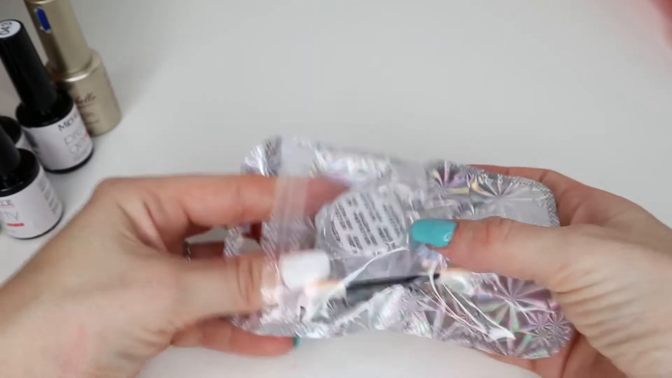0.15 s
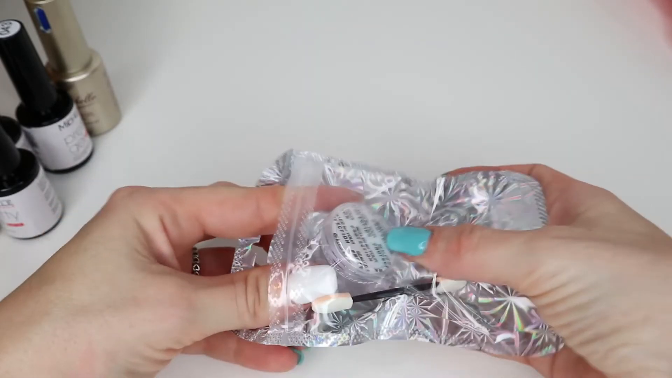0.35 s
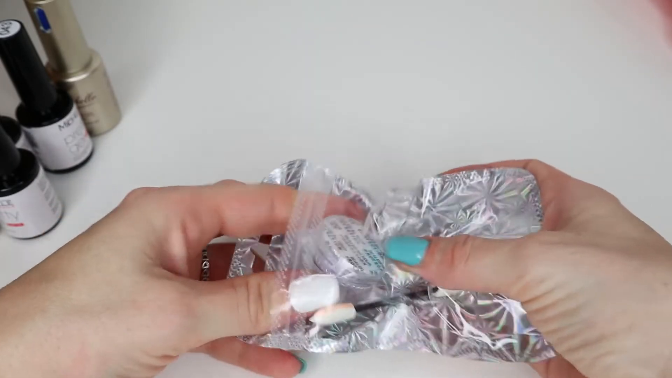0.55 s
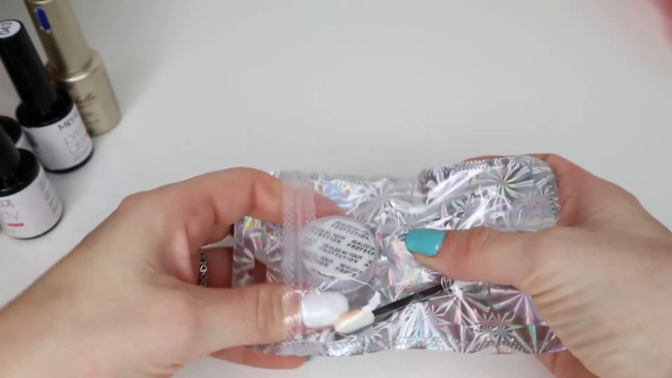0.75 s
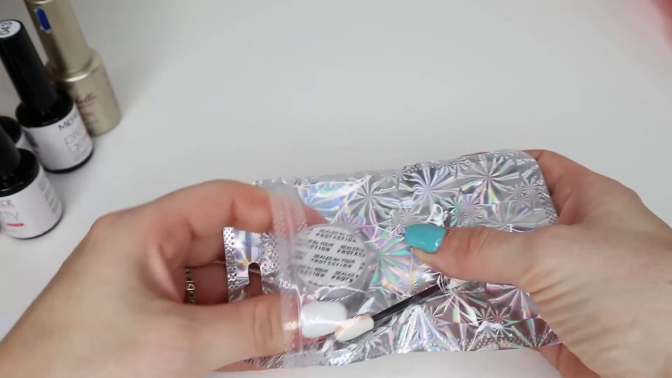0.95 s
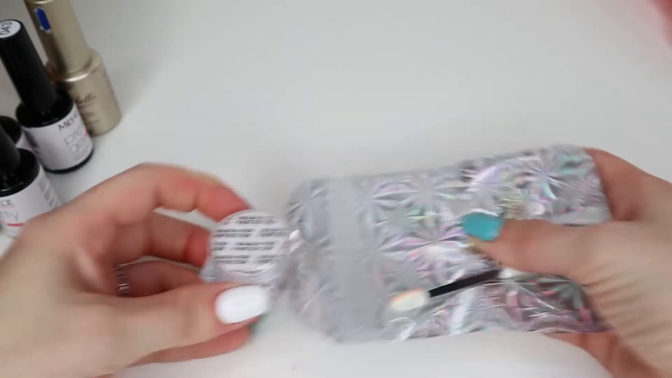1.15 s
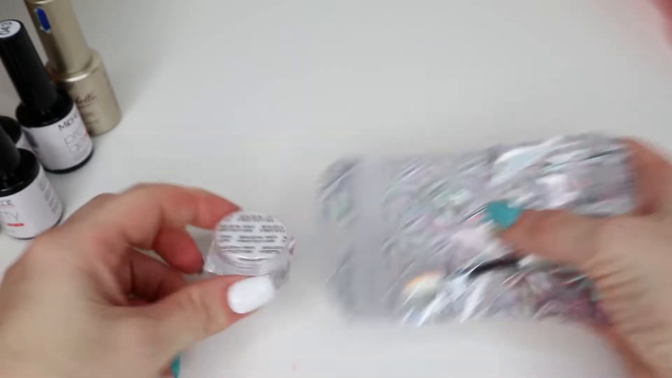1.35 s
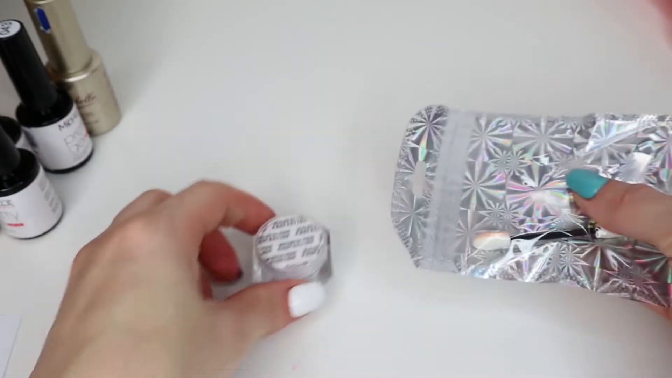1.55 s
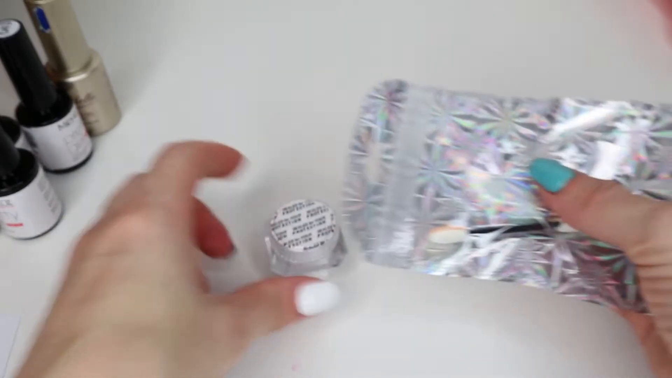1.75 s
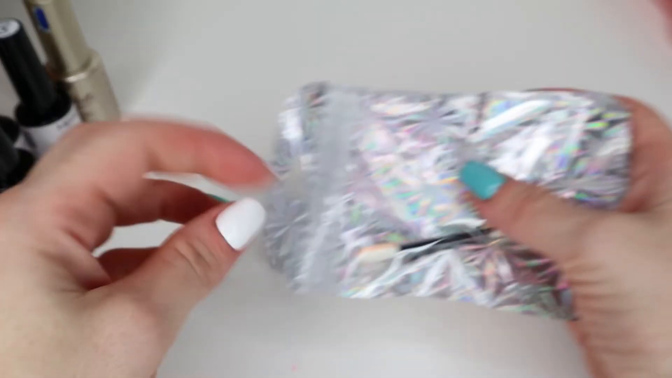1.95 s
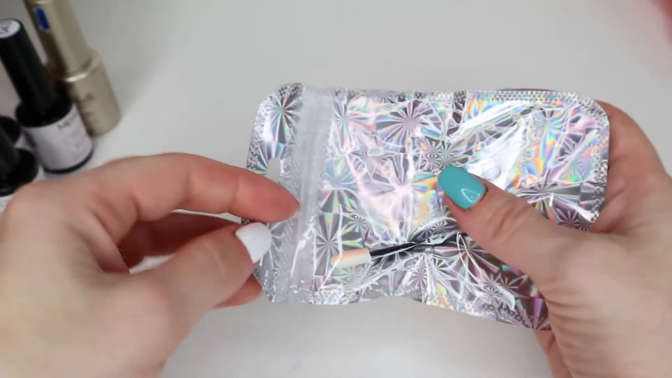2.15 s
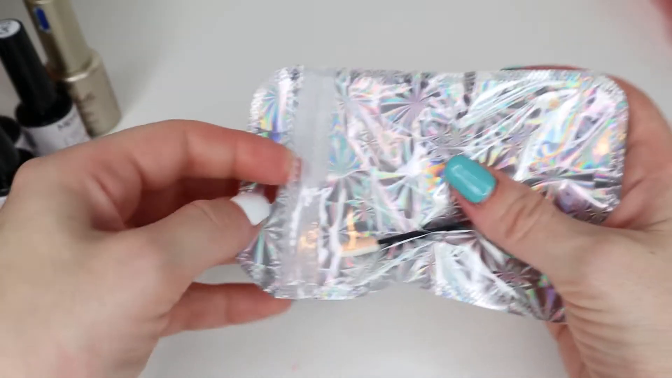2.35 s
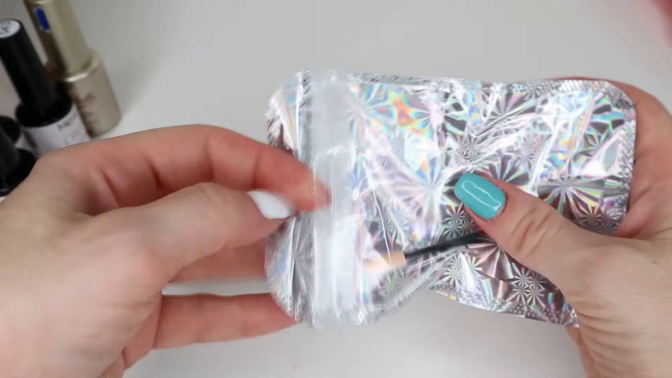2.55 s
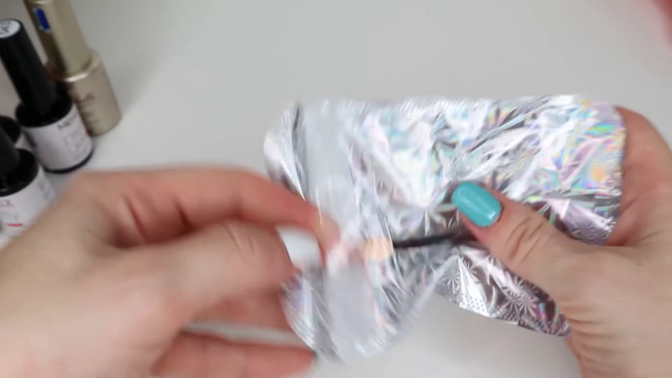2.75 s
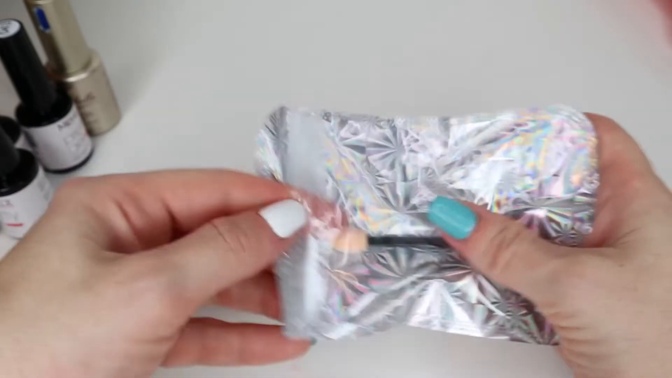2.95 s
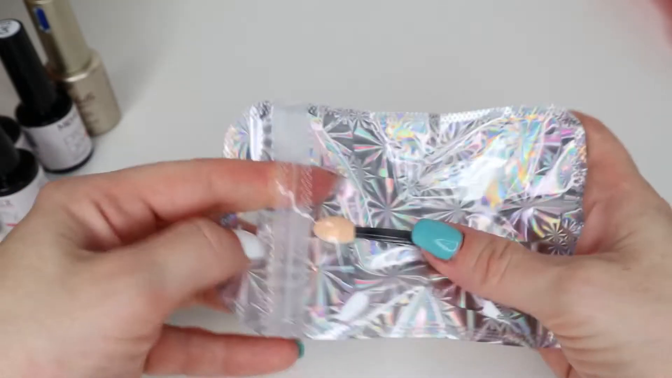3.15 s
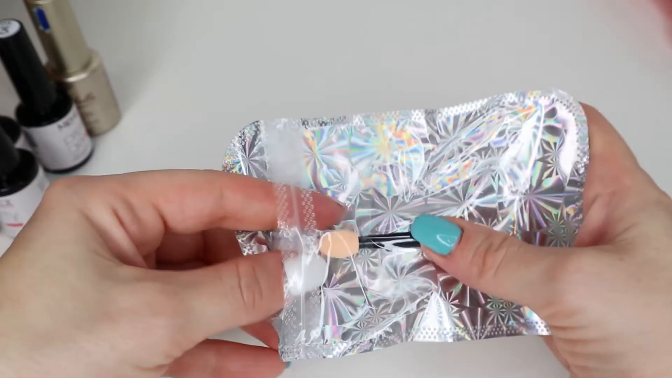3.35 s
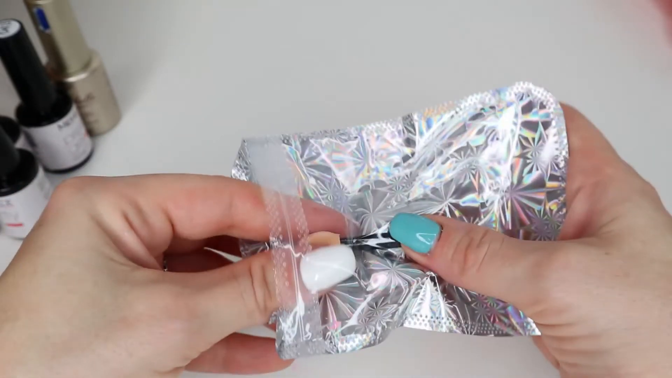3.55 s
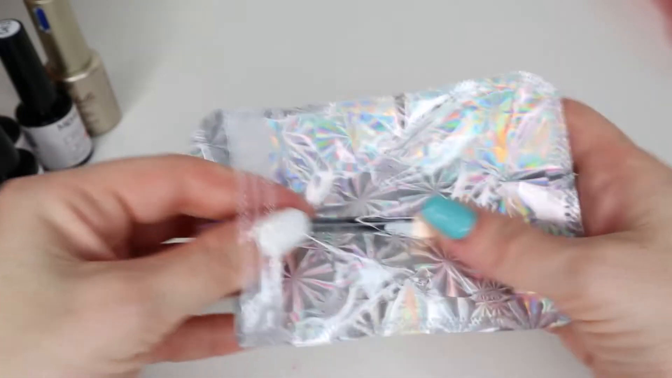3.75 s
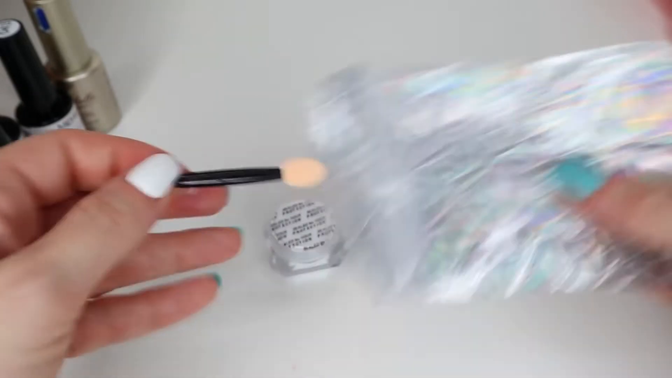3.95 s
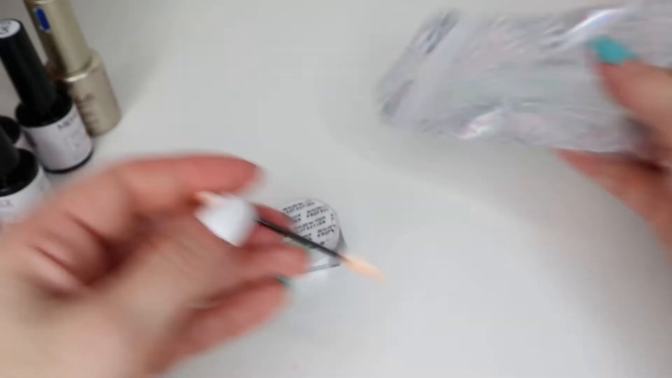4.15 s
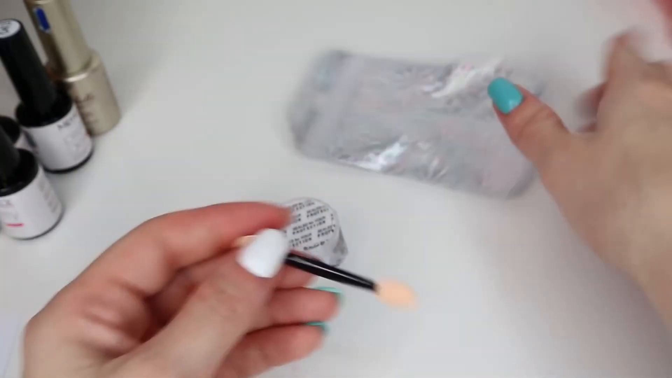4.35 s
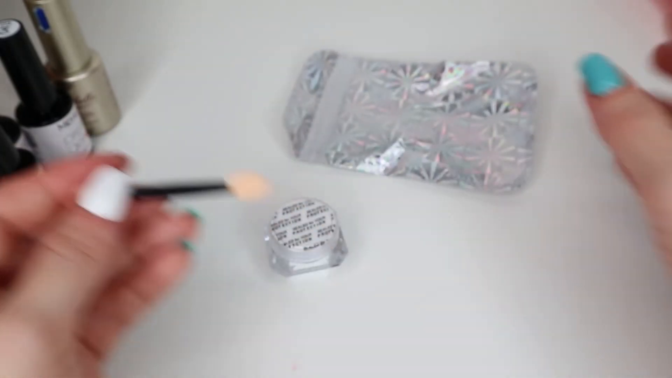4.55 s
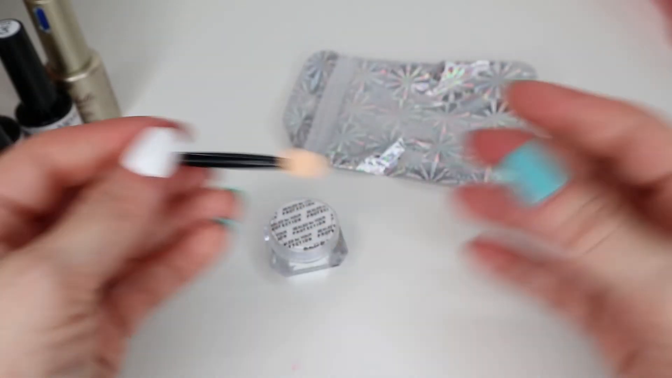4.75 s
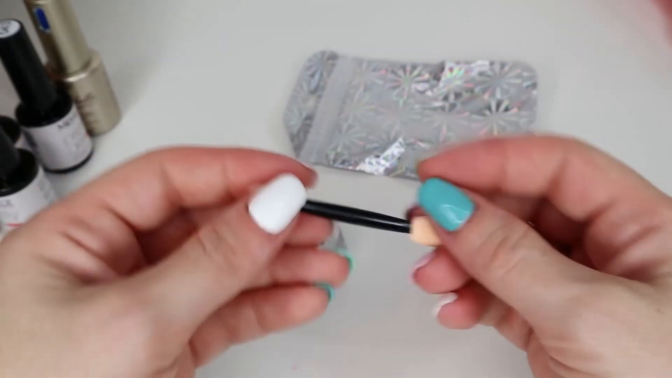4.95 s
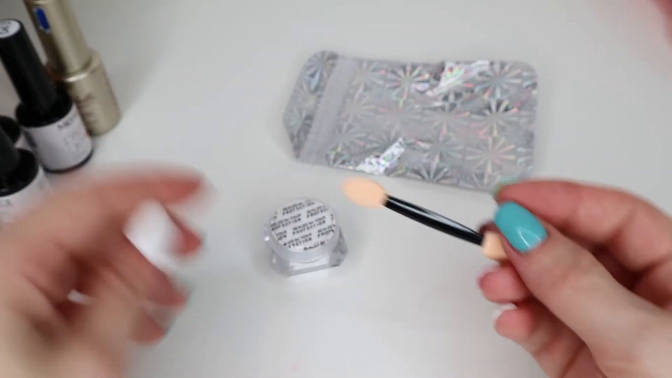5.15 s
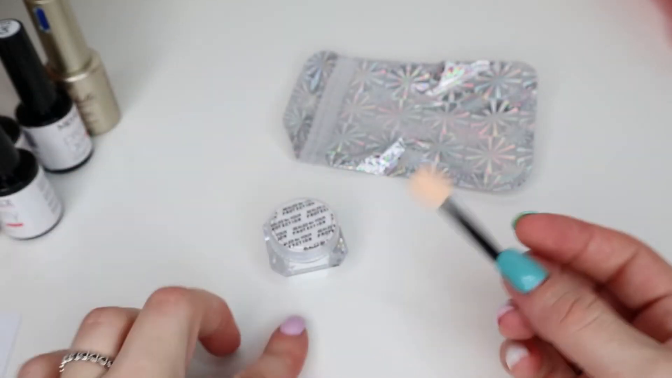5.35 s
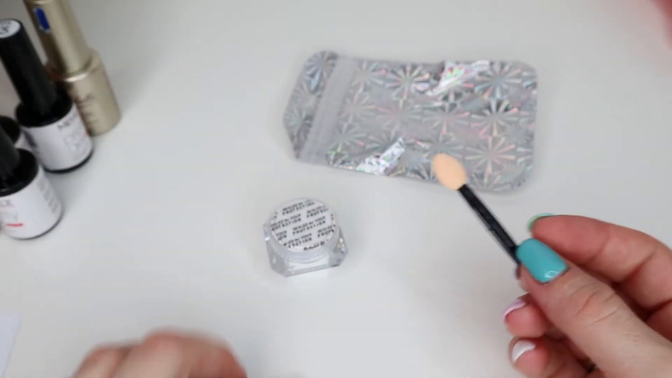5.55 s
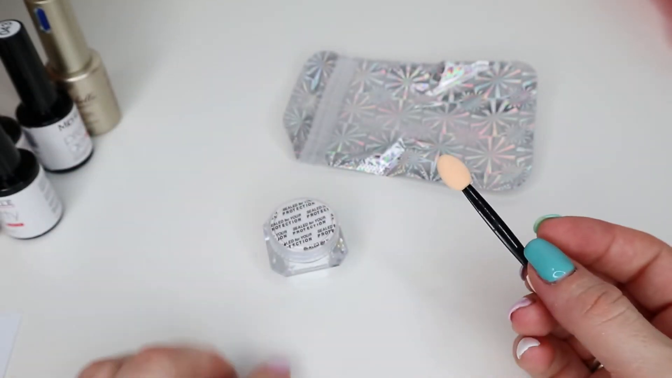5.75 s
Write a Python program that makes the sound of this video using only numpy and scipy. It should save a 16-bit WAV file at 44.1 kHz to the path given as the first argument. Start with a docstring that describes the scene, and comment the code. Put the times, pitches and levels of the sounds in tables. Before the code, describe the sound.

A close stereo pickup in a small, lively room with a quiet bed of low rumble and hiss. From the start, hands squeeze a foil zip pouch: fine dry crackle with crisp, irregular snaps, densest between 0.1 and 0.8 s, then thinning. At about 1.1 s a quick scraping rustle lets a small jar slide out. It lands at 1.5 s with a hard, bright clack, rocks in rapid knocks, then tips and rattles to rest from 1.74 to 1.85 s. A lull follows with a very faint thin whistle near 2 s. A lone sharp snap comes at 2.2 s; crinkling grows from 2.5 s, is busiest around 3 to 3.5 s, and bursts again at 3.75 to 3.95 s. A few last crackles pass by 4.1 s, with another faint sinking whistle and slight low hum. After near quiet, soft tabletop taps and dull thumps come at 5.4 s and 5.55 to 5.75 s.

```python
"""Fine foil crackle comes in spells, and larger creases snap through one by one as hands flex a zip pouch.
Each crease is a jerky noise burst with facet rings, shaped band by band; a run of tiny slips lets a jar out.
The jar clatters and settles as decaying modes with a clack; soft thumps are low modes and taps of noise.
A thin whistle and a low hum are wavering tones; a small live room adds echoes over a bed of shaped noise."""
import sys
import numpy as np
from scipy import signal
from scipy.fft import rfft, irfft
from scipy.io import wavfile

SR = 44100
rng = np.random.default_rng(int(sys.argv[2]) if len(sys.argv) > 2 else 0)


def wav_record(signal):
    """Record a signal, one row per channel, as 16-bit PCM in the file named by sys.argv[1]."""
    frames = np.transpose(np.atleast_2d(signal))
    bounded = np.clip(frames, -1, 1)
    # unit amplitude maps onto the largest positive 16-bit level
    quanta = np.round(bounded * 32767).astype(np.int16)
    wavfile.write(sys.argv[1], SR, quanta)


N = 256426
TAPS = 2048  # samples in a short burst or filter
HZ = np.fft.rfftfreq(TAPS, 1 / SR)


def amp(db):
    """Level law: decibels become an amplitude gain."""
    return 10 ** (np.asarray(db) / 20)


def unit(x):
    """Energy normalization: each signal is scaled to a sum of squares of 1."""
    return x / np.sqrt(np.sum(x ** 2, -1, keepdims=True) + 1e-20)


def read(points, hz):
    """Interpolation of a (frequency, value) table along a logarithmic frequency axis."""
    f, value = np.transpose(points)
    return np.interp(np.log(hz + 1), np.log(f + 1), value)


def add(mix, s, sound):
    """Superposition: a sound is added to the mix from time s in seconds."""
    part = mix[..., max(round(s * SR), 0):][..., :sound.shape[-1]]
    part += sound[..., :part.shape[-1]]


def causal(db):
    """Minimum phase: folding the cepstrum gives the most abrupt pulse of a given colour."""
    cepstrum = irfft(np.log(amp(db)))
    cepstrum[..., 1:TAPS // 2] *= 2
    cepstrum[..., TAPS // 2 + 1:] = 0
    return np.exp(rfft(cepstrum))


def pair(a, b, likeness):
    """Stereo coherence: unrelated mid and side signals mix to a left and right of the given likeness."""
    c = np.clip(likeness, -1, 1)
    mid = a * np.sqrt((1 + c) / 2)
    side = b * np.sqrt((1 - c) / 2)
    return np.array([mid + side, mid - side])


def ring(modes, t, uneven_db=2):
    """Modal synthesis: exponentially dying sines, each excited a little differently by every blow."""
    hz, db, t60 = np.transpose(modes)[:, :, None]
    height = amp(db + uneven_db * rng.standard_normal(hz.shape) - 60 * t / t60)
    return (height * np.sin(2 * np.pi * hz * t)).sum(0)


def contact(colour, decay_s, apart_hz=8000):
    """Impact noise: a brief coloured burst of energy 1 on each side, less alike in the treble."""
    decay = np.exp(-np.arange(TAPS) / SR / decay_s)
    noise = rfft(rng.standard_normal((2, TAPS)) * decay)
    stereo = pair(*noise, np.exp(-(HZ / apart_hz) ** 2))
    return unit(irfft(stereo * causal(read(colour, HZ))))


def narrow(hz, width_hz, likeness=0.99):
    """Modulation: slow noise carried up to the pitch hz makes a wavering tone of RMS level 1."""
    offset = np.fft.fftfreq(N, 1 / SR)
    spectrum = np.fft.fft(rng.standard_normal((2, N)))
    drift = np.fft.ifft(spectrum / (1 + 1j * offset / width_hz) ** 3)
    phase = 2 * np.pi * np.cumsum(hz * np.ones(N)) / SR
    tone = (drift * np.exp(1j * phase)).real
    return np.sqrt(N) * pair(*unit(tone), likeness)


# Limits of the bands that describe a crease. Each entry: band edge in Hz.
BAND_EDGES_HZ = [150, 600, 1400, 2800, 6000, 15000]
# The pouch as a whole colours every crease. Each row: frequency in Hz, relative level in dB.
POUCH_COLOUR = [(50, -36), (150, -17.5), (300, 0.5), (390, 1.5), (480, -3.5), (660, -3.5), (770, 3.5),
                (900, -2), (1100, 0), (1350, -2), (2250, -3), (2650, 0.5), (2950, -3), (3300, 1),
                (4550, -1), (5500, -1), (8000, -1.5), (11500, -3), (16000, -30.5)]
POWER_WINDOW_S = .005  # the energy of a crease is expressed as mean power over this time


def resonance(centre_hz, gain_db, width_hz):
    """Resonance: a single peak raises the spectrum around its centre."""
    return 1 + (amp(gain_db) - 1) / (1 + 2j * (HZ - centre_hz) / width_hz)


def creases(rows, crack_s=0.000098, jerk_db=-2, flutter_db=-12, shiver_s=0.017, shiver_db=-26,
            ring_db=9, ring_width_hz=190, upper_ring_hz=3300, upper_spread=0.29,  # spread in octaves
            upper_ring_db=6, upper_width_hz=650, apart_hz=9800):
    """Buckling: rows of (s, ring Hz, flutter s, dB in each band) crack in three jerks, flutter and ring."""
    t = np.arange(TAPS) / SR
    ring_hz, length = rows[:, 1:2], rows[:, 2:3]
    shape = np.exp(-t / crack_s)
    shape = shape + amp(flutter_db) * np.exp(-t / length)
    shape = shape + amp(shiver_db) * np.exp(-t / shiver_s)
    for share in rng.random((2, len(rows), 1)):
        age = t - length * share
        shape = shape + amp(jerk_db) * np.exp(-abs(age) / crack_s) * (age > 0)
    noise = rfft(rng.standard_normal((len(rows), 2, TAPS)) * shape[:, None])

    # short waves leave the sheet differently towards the two microphones
    burst = pair(noise[:, 0], noise[:, 1], np.exp(-(HZ / apart_hz) ** 3))
    burst = burst * causal(read(POUCH_COLOUR, HZ))
    burst = burst * resonance(ring_hz, ring_db, ring_width_hz)
    # a higher ring sits wherever the foil happens to be stretched
    upper_hz = upper_ring_hz * 2 ** (upper_spread * rng.standard_normal(ring_hz.shape))
    burst = burst * resonance(upper_hz, upper_ring_db, upper_width_hz)

    # the size and stiffness of the facet share the energy out among the bands
    low, high = np.array(BAND_EDGES_HZ[:-1]), np.array(BAND_EDGES_HZ[1:])
    member = ((HZ[:, None] >= low) & (HZ[:, None] < high)) * 1.
    centres = np.sqrt(low * high)
    blend = np.array([read(list(zip(centres, one)), HZ) for one in np.eye(len(low))])
    for _ in range(2):  # smooth filters overlap the bands, so a second pass comes closer
        power = (abs(burst) ** 2).mean(0) @ member * 2 / (TAPS * POWER_WINDOW_S * SR)
        burst = burst * causal((rows[:, 3:] - 10 * np.log10(power)) @ blend)

    out = np.zeros((2, N))
    for s, sound in zip(rows[:, 0], irfft(burst).swapaxes(0, 1)):
        add(out, s, sound)
    return out


# Large creases snapping through. Each row: start in seconds, level in dB over 5 ms, brightness in dB per
# octave, breadth in dB per octave squared (low = only the middle sounds), facet ring in Hz,
# flutter length in seconds.
SNAPS = [(0.019, -39.5, -1, 3.5, 1220, 0.0012), (0.0924, -22, -1, 0, 1860, 0.0028),
         (0.0955, -10, 2, 1.5, 830, 0.0016), (0.112, -34, 0, 1, 1380, 0.0022),
         (0.133, -24.5, -5.5, -4, 850, 0.0028), (0.1857, -26.5, 1.5, 3, 1810, 0.0022),
         (0.1995, -21.5, 1, 0.5, 1020, 0.0058), (0.2091, -20.5, -1.5, -1, 730, 0.00095),
         (0.2248, -16.5, -1, 0.5, 1390, 0.005), (0.2457, -22, 2.5, 0.5, 1480, 0.0033),
         (0.2853, -23.5, -1.5, 3, 1000, 0.0058), (0.2914, -20.5, -3, 0, 810, 0.0052),
         (0.315, -28, 3.5, -1, 1040, 0.0035), (0.342, -28, -10.5, 6, 1010, 0.0029),
         (0.4179, -15, -1.5, 2.5, 940, 0.0022), (0.4227, -16, 2.5, 0, 1670, 0.001),
         (0.4333, -27, 1.5, -6, 1430, 0.0036), (0.4367, -18, 1.5, 0, 1360, 0.0042),
         (0.44, -16, 10.5, -3, 1100, 0.0011), (0.4619, -17.5, 6, -5.5, 1590, 0.0026),
         (0.464, -24.5, 0.5, 1, 1690, 0.0016), (0.4904, -24.5, 2, 2, 1450, 0.002),
         (0.5294, -24.5, 1.0, 0, 930, 0.0014), (0.5554, -13.5, 0, 1, 1770, 0.0037),
         (0.5946, -21, 0.5, -1, 1750, 0.0021), (0.61, -23.5, 2, 0.5, 1600, 0.0048),
         (0.6194, -18, 0.5, 2, 1100, 0.0015), (0.6356, -24.5, 16, -3, 1730, 0.0025),
         (0.645, -20.5, 2, -3.5, 1710, 0.0051), (0.667, -21, 2, 0, 1910, 0.0021),
         (0.682, -24, 4, -5.5, 1380, 0.0059), (0.733, -19.5, 7, -0.5, 1720, 0.0025),
         (0.74, -20, 1.5, -2, 1070, 0.0013), (0.7588, -19.5, 3.5, 0.5, 1340, 0.0032),
         (0.787, -29, -1.5, -2, 1100, 0.0034), (0.838, -26.5, -2, 2, 835, 0.0024),
         (0.885, -28, -1, -1, 1620, 0.0018), (0.917, -31, -1.5, 2, 1020, 0.0021),
         (0.933, -34, 1.5, -1, 1300, 0.0015), (1.012, -27.5, 2.5, 0, 1060, 0.0041),
         (1.112, -27.5, -2, 1, 1200, 0.0043), (1.1274, -20, 0, -3.5, 1660, 0.0035),
         (1.1331, -16, 0, 0.5, 860, 0.0046), (1.149, -17, 4, 0.5, 840, 0.0046),
         (1.1635, -16, 2, -0.5, 820, 0.0049), (1.1957, -18.5, -2, 1, 1050, 0.006),
         (1.333, -31.5, -3, 1, 1210, 0.004), (1.4564, -29, -0.5, 1, 740, 0.0026),
         (2.0903, -33.5, -8, -2, 985, 0.0015), (2.134, -33, -4, 1.5, 810, 0.0022),
         (2.16, -34, -0.5, -1, 890, 0.00096), (2.2097, -31.5, -3, -2, 980, 0.00098),
         (2.2202, -11.5, 1, 1.27, 1100, 0.0017), (2.3117, -32.5, -4, 4, 1080, 0.0055),
         (2.365, -35.5, -8, -2, 1110, 0.0026), (2.485, -28, -2, 1.5, 1730, 0.0044),
         (2.4913, -24, 4.5, -2.5, 1700, 0.0038), (2.606, -20.5, 2, 1.0, 840, 0.0026),
         (2.623, -20.5, 0, 2, 785, 0.00099), (2.711, -25, -11.5, 1.5, 850, 0.0011),
         (2.7211, -25, 5.5, -3, 980, 0.0017), (2.769, -22, -2, 0.5, 900, 0.0037),
         (2.783, -48.5, -14, -11.5, 1810, 0.0018), (2.809, -16, 4, -1.5, 820, 0.0028),
         (2.831, -23, 0, 1, 775, 0.003), (2.8495, -22, -3, -1, 760, 0.0039),
         (2.863, -23, 3.5, -2, 1330, 0.0015), (2.872, -22, 1, 2.5, 1190, 0.001),
         (2.8966, -26, -1.5, 0, 1140, 0.0011), (2.9733, -19.5, -2, -0.5, 1160, 0.0033),
         (2.9934, -15, 1, 1, 840, 0.0028), (3.007, -27.5, -3.5, -1.5, 939, 0.0024),
         (3.0354, -19.5, 2.5, -3.5, 1700, 0.0035), (3.059, -16, -2, 0.5, 855, 0.0032),
         (3.0757, -19, 2, -1, 1030, 0.00049), (3.083, -32, -2, 1.5, 820, 0.0012),
         (3.1025, -19.5, 3, 1.0, 1130, 0.0019), (3.121, -22.5, 1.5, 1.5, 1120, 0.0034),
         (3.144, -14, 1.5, 2, 1840, 0.0015), (3.1735, -30, 2.5, 0, 1020, 0.0011),
         (3.2007, -18, 1, 1, 960, 0.0031), (3.2303, -17.5, -2.5, -0.5, 1150, 0.0028),
         (3.236, -28, 1, 4, 780, 0.0012), (3.2482, -13.5, 1, 1.4, 1020, 0.0025),
         (3.3006, -21, -1.5, 1.5, 976, 0.0026), (3.314, -34.5, -10, 1, 750, 0.0023),
         (3.3444, -23.5, -2, 1, 1000, 0.0029), (3.35, -19.5, 2.5, -1.5, 780, 0.0011),
         (3.36, -26.5, -10.5, -3, 780, 0.0022), (3.406, -28, -6, 2.5, 900, 0.0035),
         (3.443, -20.5, 1, 1, 1880, 0.0065), (3.4492, -14.5, 3.5, 1.5, 1100, 0.0049),
         (3.4723, -23.5, -1, 1.5, 1040, 0.0023), (3.542, -18, 2.5, -0.5, 1856, 0.0022),
         (3.5622, -22, 1, 1, 1030, 0.0017), (3.583, -31.5, -5.5, 2, 1000, 0.002),
         (3.593, -27.5, 0.5, 1, 850, 0.003), (3.69, -24, 1.5, -0.5, 1820, 0.0022),
         (3.7555, -28.5, -2, 2, 1000, 0.0012), (3.762, -22, 3.5, 0, 785, 0.0042),
         (3.776, -27, 3.5, -0.5, 1050, 0.0022), (3.792, -25.5, -1, 1, 1450, 0.0026),
         (3.808, -22.5, -0.5, 0.5, 1110, 0.0041), (3.829, -23, 1.5, 1.5, 1000, 0.0022),
         (3.845, -19, 1.0, 1, 794, 0.0051), (3.868, -21, 0, 0.5, 1080, 0.0025),
         (3.8722, -17, -0.5, 1, 830, 0.0012), (3.894, -18, 1, 1.5, 1100, 0.0029),
         (3.904, -25, -2, 3, 980, 0.0015), (3.915, -20, -3.5, 2, 1030, 0.0031),
         (3.9388, -22, 1, 2.5, 1820, 0.0027), (3.9476, -18.5, 2, 0.5, 786, 0.0019),
         (4.0323, -30.0, -4, -1, 803, 0.0011), (4.107, -23.5, 2, 0, 981, 0.002),
         (4.1186, -25, -0.5, 2.5, 1010, 0.0017), (4.302, -35, -4, 3, 706, 0.0046),
         (4.4453, -39, -4, 2, 1010, 0.005)]
# Colour of an average snap. Each entry: relative level of one band in dB.
SNAP_COLOUR = [-24.5, -5.5, -5.5, -5.5, -15.5]


def snaps(uneven_db=1, pivot_hz=2000, bass_limit_db=-10):
    """Snap-through buckling: a stiff facet is brighter and a sudden one broader than the common colour."""
    s, db, bright, breadth, ring_hz, length = np.transpose(SNAPS)[:, :, None]
    edges = np.log2(np.array(BAND_EDGES_HZ) / pivot_hz)
    octaves = (edges[:-1] + edges[1:]) / 2
    colour = SNAP_COLOUR + bright * octaves + breadth * octaves ** 2
    # thin foil moves little air in the bass
    colour[:, 0] = np.minimum(colour[:, 0], colour[:, 1] + bass_limit_db)
    colour = colour + uneven_db * rng.standard_normal(colour.shape)
    band_db = db + 20 * np.log10(unit(amp(colour)))
    return creases(np.hstack([s, ring_hz, length, band_db]))


# Fingers squeeze or shift the pouch. Each row: start in seconds, length in seconds, relative level in dB.
SQUEEZES = [(0, 0.033, -22.5), (.05, 0.049, -29.5), (.17, 0.15, -25), (.3, 0.11, -26.5),
            (.42, 0.056, -27.5), (.58, 0.14, -20.5), (.74, 0.078, -28), (.8, 0.25, -35), (2.08, 0.12, -48),
            (2.26, 0.16, -59), (2.495, 0.13, -32), (2.78, 0.13, -30), (2.975, 0.045, -21),
            (3.02, 0.18, -21.5), (3.29, 0.078, -38.5), (3.432, 0.037, -41), (3.55, 0.067, -41),
            (3.76, 0.076, -28), (3.845, .1, -21.5), (4.03, 0.13, -33)]
# Colour of the fine crackle. Each entry: relative level of one band in dB.
CRACKLE_COLOUR = [-14.5, -4, -3.5, -4.5, -14.5]
# crackle starts strongest, eases quickly up to this share of a squeeze, then ebbs more slowly to its end;
# the start and end levels are in dB relative to the knee
SQUEEZE_KNEE, SQUEEZE_START_DB, SQUEEZE_END_DB = 0.17, 3.5, -7.5


def crackle(count=16, level_db=-2, spread_db=15, colour_db=3.5, lowest_hz=700, highest_hz=3500,
            length_s=.0012):
    """Crackling noise: tiny creases of random size give way at random, fainter as each squeeze goes on."""
    start, length, db = np.repeat(SQUEEZES, count, axis=0).T
    place, size, pitch = rng.random((len(start), 3)).T
    progress = (np.arange(len(start)) % count + place) / count
    effort = np.interp(progress, [0, SQUEEZE_KNEE, 1], [SQUEEZE_START_DB, 0, SQUEEZE_END_DB])
    level = db + effort + level_db + spread_db * (size ** 2 - 1)
    uneven = colour_db * rng.standard_normal((len(start), len(CRACKLE_COLOUR)))
    band_db = level[:, None] + np.array(CRACKLE_COLOUR) + uneven
    ring_hz = lowest_hz * (highest_hz / lowest_hz) ** pitch
    return creases(np.column_stack([start + progress * length, ring_hz, length_s * (.5 + size), band_db]))


# Colour of the jar's slide along the foil. Each entry: relative level of one band in dB.
SLIDE_COLOUR = [-13.5, -5.5, -3.5, -8.5, -15.5]
SLIDE_S, SLIDE_LENGTH_S, SLIDE_DB = 1.108, 0.125, -25  # start, length, relative level of the strongest slips


def slide(count=100, spread_db=12, colour_db=3, lowest_hz=700, highest_hz=3500, length_s=.002):
    """Stick-slip friction: the jar drags along the foil in a dense run of slips that swells and ebbs."""
    place, size, pitch = rng.random((count, 3)).T
    progress = (np.arange(count) + place) / count
    swell_db = 20 * np.log10(np.sin(np.pi * progress) + 1e-6)
    level = SLIDE_DB + swell_db + spread_db * (size - 1)
    uneven = colour_db * rng.standard_normal((count, len(SLIDE_COLOUR)))
    band_db = level[:, None] + np.array(SLIDE_COLOUR) + uneven
    ring_hz = lowest_hz * (highest_hz / lowest_hz) ** pitch
    s = SLIDE_S + progress * SLIDE_LENGTH_S
    return creases(np.column_stack([s, ring_hz, length_s * (.5 + size), band_db]))


# The jar lands, rocks on its rim, tips over and rattles to rest. Each row: start in seconds,
# relative blow level in dB, brightness in dB per octave.
JAR_KNOCKS = [(1.5164, 0.5, 1), (1.5254, -6.5, 0.5), (1.5327, -6.5, 0.5), (1.5378, -6.5, 0),
              (1.544, -5.5, 1), (1.5555, -12, 0), (1.5852, -8.5, 0.5), (1.6755, -22, 3.5),
              (1.7383, -9, 0.5), (1.7453, -14.5, 4.5), (1.764, -5.5, 5), (1.7775, -11, 1.5),
              (1.783, -9, -0.5), (1.7954, -11.5, 1), (1.802, -13.5, 2), (1.812, -16, 3), (1.819, -12.5, 0),
              (1.828, -17, 2.5), (1.848, -17, 0)]
# What jar and table ring with. Each row: nominal frequency in Hz, relative level in dB,
# time to fall by 60 dB in seconds.
JAR_MODES = [(235, -5, 0.09), (339, -6, 0.066), (637, -1, 0.11), (776, 9, 0.083), (851, 2.5, 0.12),
             (1056, 9.5, 0.047), (1290, 3.5, 0.054), (1424, -2, 0.086), (1487, -10, 0.13),
             (1630, 6.5, 0.067), (1700, 8.5, 0.044), (1824, 5, 0.069), (2080, 5.5, 0.037),
             (2316, 1.5, 0.078), (2640, 5.5, 0.031), (2970, -4, 0.05), (3320, -3, 0.035),
             (5046, -2.5, 0.028), (5150, -2.5, 0.034)]
# The short clack of the contact. Each row: frequency in Hz, relative level in dB.
CLACK_COLOUR = [(40, -20), (100, 4), (220, 0), (420, -19), (800, -0.5), (1800, 1), (3100, -1.5),
                (4200, -17), (4800, -27), (5150, -13), (5600, -26), (6600, -30.5), (12000, -39),
                (16000, -68)]


def jar(clack_db=9.0, ring_db=12, clack_s=0.0074, scatter_s=0.000784, detune=0.0071):
    """Impact excitation: every knock sets off the modes of jar and table and a clack of noise."""
    out = np.zeros((2, N))
    t = np.arange(SR // 4) / SR
    for s, db, bright in JAR_KNOCKS:
        body = np.zeros(len(t))
        for hz, mode_db, t60 in JAR_MODES:
            # each mode shifts with the point of contact and reaches the air by its own short path
            shifted_hz = hz * (1 + detune * (2 * rng.random() - 1))
            age = np.maximum(t - scatter_s * rng.random(), 0)
            body += ring([(shifted_hz, mode_db, t60)], age)
        blow = amp(ring_db) * np.tile(unit(body), (2, 1))  # the ring reaches both microphones alike
        add(blow, 0, amp(clack_db) * contact(CLACK_COLOUR, clack_s))
        hardness = irfft(causal(bright * np.log2(np.clip(HZ, 300, 8000) / 1500)))
        add(out, s, amp(db) * signal.fftconvolve(blow, hardness[None], axes=1))
    return out


# Soft low thumps: the jar comes free, the hands handle the pouch, the pouch drops, then hand and fingers
# land on the table. Each row: start in seconds, relative thud level in dB, relative tap level in dB.
BUMPS = [(1.194, -46, -30), (2.297, -43.5, -41), (2.491, -51, -39), (2.62, -53, -33.5), (2.771, -52, -33),
         (3.144, -47.5, -32), (3.592, -68, -47), (3.811, -49, -37), (3.873, -41, -35), (3.926, -44, -33),
         (4.304, -44.5, -43), (5.385, -31.5, -25.5), (5.4, -35, -27.5), (5.457, -40, -42),
         (5.538, -42, -58), (5.551, -36.5, -62), (5.578, -43, -34.5), (5.622, -47, -40.5),
         (5.6614, -36, -35.5), (5.67, -24.5, -47), (5.684, -32.5, -41), (5.733, -33, -48)]
# Low modes of a thump, those of the table top under a soft blow. Each row: frequency in Hz,
# relative level in dB, time to fall by 60 dB in seconds.
THUD_MODES = [(76, 5, 0.1), (115.7, 11, 0.036), (143.5, -3, 0.24), (217, -14, 0.25)]
# The tap, as of a fingertip. Each row: frequency in Hz, relative level in dB.
TAP_COLOUR = [(30, -28), (70, -13), (200, 3), (450, 0.5), (600, -2), (850, -1.5), (1300, -16),
              (2000, -12.5), (2650, -10.5), (3400, -20), (4500, -24), (10000, -39.5), (16000, -46)]


def bumps(soft_s=0.0033, tap_s=0.008, tap_db=24, thud_db=0.5):
    """Soft impact: a gradual push eases the low modes in, and a short noise burst adds a tap."""
    out = np.zeros((2, N))
    t = np.arange(SR // 3) / SR
    onset = 1 - np.exp(-t / soft_s)
    for s, thud, tap in BUMPS:
        add(out, s, amp(thud + thud_db) * ring(THUD_MODES, t) * onset)
        add(out, s, amp(tap + tap_db) * contact(TAP_COLOUR, tap_s))
    return out


# A faint thin whistle. Each row: start in seconds, length in seconds, starting pitch in Hz,
# relative level in dB.
WHISTLES = [(1.885, 0.33, 1980, -52.5), (4.057, 0.55, 1956, -48)]
UPPER_PARTIAL = 2.11  # ratio to the main pitch


def whistles(sag_hz_per_s=130, waver_hz=26, waver_rate_hz=70, attack_s=0.067, release_s=.2,
             tone_db=-7, blur_db=-2.5, width_hz=170, upper_db=-22):
    """Frequency modulation: a wavering tone with a faint upper partial sinks in pitch and trails off."""
    out = np.zeros((2, N))
    for start, length, hz, db in WHISTLES:
        age = np.clip(np.arange(N) / SR - start, 0, length)
        pitch = hz - sag_hz_per_s * age + waver_hz * narrow(0, waver_rate_hz)[0]
        swell = np.minimum(np.minimum(age / attack_s, (length - age) / release_s), 1)
        tone = amp(tone_db) * np.sqrt(2) * np.sin(2 * np.pi * np.cumsum(pitch) / SR)
        blur = amp(blur_db) * narrow(pitch, width_hz)
        upper = amp(upper_db) * narrow(UPPER_PARTIAL * pitch, width_hz)
        out += amp(db) * swell * (tone + blur + upper)
    return out


# A faint low hum. Each row: time in seconds, pitch in Hz, relative level in dB.
HUM = [(0, 400, -52.5), (1.001, 376, -54.5), (1.598, 359.2, -61), (2.0, 349, -47.5), (2.248, 364, -63.5),
       (2.6, 367.5, -48.5), (3.1, 390.4, -45.5), (3.5, 370, -65), (4.18, 375.5, -49.5), (4.4, 350, -49.5),
       (4.58, 325.7, -55), (4.85, 334, -76)]


def hum(width_hz=130):
    """Narrow-band noise: a faint low hum wavers around a gliding pitch under the handling."""
    s, hz, db = np.transpose(HUM)
    clock = np.arange(N) / SR
    return amp(np.interp(clock, s, db)) * narrow(np.interp(clock, s, hz), width_hz)


# Decay of the room. Each row: frequency in Hz, time to fall by 60 dB in seconds.
ROOM_T60 = [(100, 0.35), (400, 0.56), (1000, 0.59), (2800, 0.6), (7000, 0.48), (14000, 0.31)]
# Colour of the room. Each row: frequency in Hz, relative echo level in dB.
ROOM_COLOUR = [(60, -9), (170, -9), (370, -1), (480, -1.5), (660, -7.5), (780, -10.5), (1100, -6.5),
               (1400, -3.5), (2000, -5), (3000, -7.5), (5000, -2.5), (9000, 0.5), (13000, -1.5),
               (15000, -23)]
# Stereo width of the room. Each row: frequency in Hz, left-right likeness from -1 to 1.
ROOM_LIKENESS = [(100, 1), (600, 1), (1200, 1), (2600, 0.8), (4600, 0.32), (8500, -0.33), (15000, -0.54)]


def room(x, first_s=0.00053, build_s=0.00084, early_db=2, early_s=0.026, turn_hz=3):
    """Diffuse reverberation: two decaying noise tails take turns, so the echo's colour keeps varying."""
    out = np.zeros((2, N))
    clock = np.arange(N) / SR
    for k in range(2):
        hz, t, z = signal.stft(rng.standard_normal((2, SR)), SR, nperseg=256)
        decay = amp(-60 * t / read(ROOM_T60, hz)[:, None])
        z = pair(*z, read(ROOM_LIKENESS, hz)[:, None]) * decay
        tail = signal.istft(z, SR, nperseg=256)[1]
        age = np.maximum(np.arange(tail.shape[1]) / SR - first_s, 0)
        build_up = 1 - np.exp(-age / build_s)
        early_lift = amp(early_db * np.exp(-age / early_s))
        tail = unit(tail * build_up * early_lift)
        tail = signal.fftconvolve(tail, irfft(causal(read(ROOM_COLOUR, HZ)))[None], axes=1)
        # a quarter cycle apart, each input channel swells, fades and changes sign in its own tail
        turn = np.cos(2 * np.pi * turn_hz * clock + k * np.pi / 2)
        out += signal.fftconvolve((x[k] * turn)[None], tail, axes=1)[:, :N]
    return out


# Colour of the quiet background. Each row: frequency in Hz, relative spectral level in dB per Hz.
HUSH_COLOUR = [(15, -47), (25, -15.5), (97, -7), (145, -8), (170, -9), (206, -6), (242, -10), (451, -10.5),
               (489, -10.5), (607, -12), (1190, -12.5), (1560, -14.5), (10400, -31.5), (11600, -39),
               (16000, -57)]
# Stereo width of the background. Each row: frequency in Hz, left-right likeness from -1 to 1.
HUSH_LIKENESS = [(50, 1), (200, 0.53), (450, -0.12), (1200, -0.29), (4000, -0.37), (12000, -0.84)]


def hush(level_db=-50):
    """Stationary noise: a fixed spectrum gives low room rumble and microphone hiss."""
    hz = np.fft.rfftfreq(N, 1 / SR)
    noise = rfft(rng.standard_normal((2, N)))
    z = pair(*noise, read(HUSH_LIKENESS, hz)) * amp(read(HUSH_COLOUR, hz))
    return amp(level_db) * np.sqrt(N) * unit(irfft(z, N))


def scene(foil_room_db=-3, jar_room_db=0.5, jar_dull_hz=4700, bump_room_db=-10):
    """Superposition of direct and reverberant sound, over the background."""
    foil = snaps() + crackle() + slide()
    pot = jar()
    thumps = bumps()
    # the jar's echo is duller than its direct sound
    dull_pot = signal.sosfilt(signal.butter(2, jar_dull_hz, fs=SR, output="sos"), pot)
    echo = room(amp(foil_room_db) * foil + amp(jar_room_db) * dull_pot + amp(bump_room_db) * thumps)
    balance = amp([[-.2], [.2]])  # left, right
    return (foil + pot + thumps + echo + whistles() + hum()) * balance + hush()


def record(dry, low_cut_hz=48, edge_hz=16300):
    """Band limiting: the deepest bass is shed, peaks are clipped at full scale, then the top is cut."""
    lean = signal.sosfilt(signal.butter(3, low_cut_hz, "highpass", fs=SR, output="sos"), dry)
    edge = signal.firwin(255, edge_hz, window=("kaiser", 9), fs=SR)
    return signal.oaconvolve(np.clip(lean, -1, 1), edge[None], "same", axes=1)


dry = scene()
out = record(dry)
wav_record(out)
```